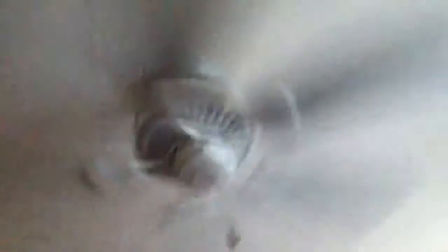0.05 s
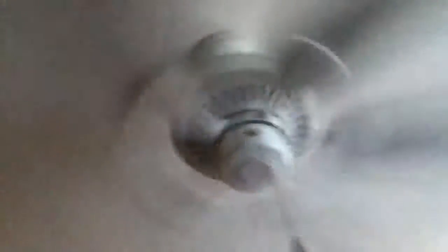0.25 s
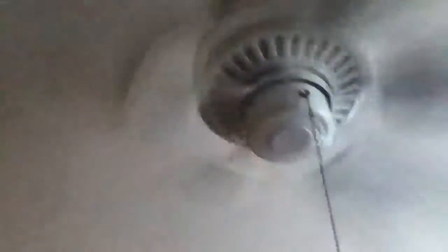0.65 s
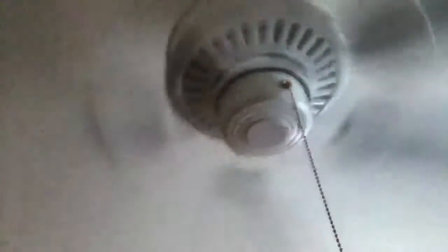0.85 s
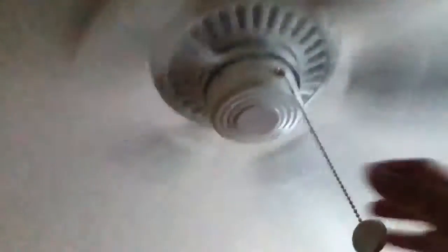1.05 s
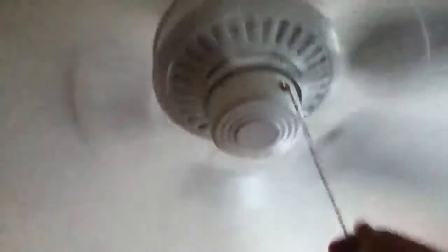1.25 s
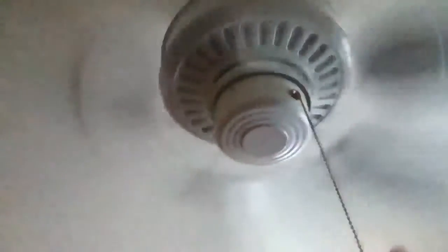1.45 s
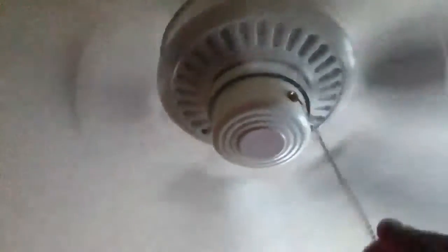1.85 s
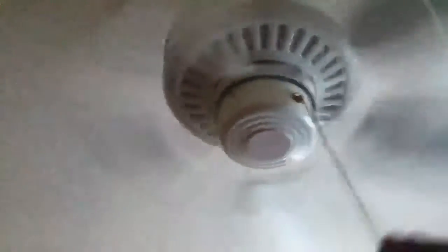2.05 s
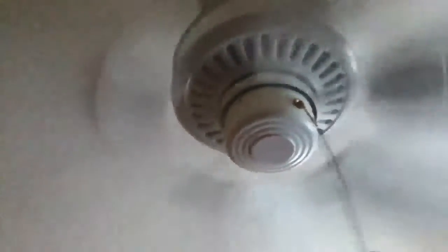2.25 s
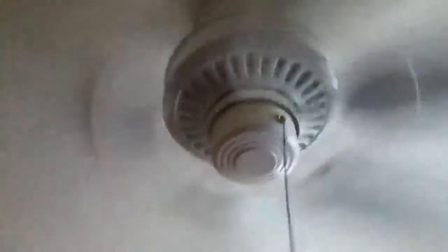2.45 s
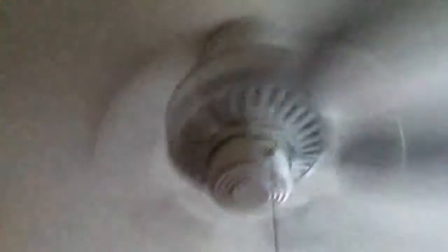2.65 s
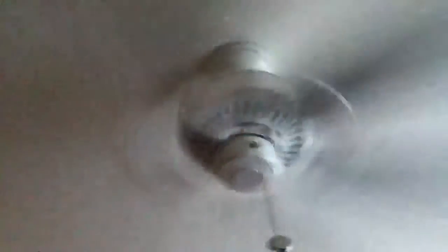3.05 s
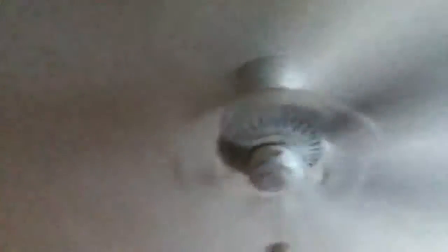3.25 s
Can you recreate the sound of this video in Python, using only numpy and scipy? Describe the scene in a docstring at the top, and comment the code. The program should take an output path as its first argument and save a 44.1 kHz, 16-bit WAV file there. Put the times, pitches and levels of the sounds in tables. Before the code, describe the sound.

A ceiling fan's pull chain switch clacks over a steady low blade rush and faint motor hum in a bedroom. The downdraft buffets the microphone in low puffs until about 3 seconds. Between 1.5 and 2.2 seconds come three quick pulls, each with ticking beads, a clack and a lightly ringing snap back. Small handling knocks follow near 2.5, 2.9 and 3.1 seconds, with one pendant tick at 2.6.

```python
"""The switch of a ceiling fan is pulled three times by its bead chain, heard from just below in a bedroom.
Each time the beads tick, the switch clacks down, and its spring snaps it back, ringing the motor housing.
All along the blades rush, the motor hums and the downward draught buffets the microphone.
Afterwards a hand makes a few small knocks on the camera, and the pendant on the chain ticks once."""
import sys
import numpy as np
from scipy import signal
from scipy.fft import rfft, irfft, next_fast_len
from scipy.io import wavfile
from scipy.ndimage import map_coordinates

SR = 44100
rng = np.random.default_rng(int(sys.argv[2]) if len(sys.argv) > 2 else 0)


def to_wav(sig):
    """Store sig (one row per channel, or 1-D mono) as 16-bit WAV at the path in sys.argv[1].

    Samples outside -1..1 are clipped; the rate is SR.
    """
    pcm = np.clip(np.atleast_2d(sig), -1, 1) * 32767
    pcm = np.round(pcm).astype(np.int16)
    wavfile.write(sys.argv[1], SR, pcm.T)  # frames by channels


N = 149940

# The tone of metal contact, shared by the beads and the pulls. Each row: frequency in Hz, level in dB.
CONTACT_TONE = [(250, -25), (560, 14.5), (750, -1), (1450, 6), (2000, 3.5), (2900, -1), (3600, 7),
                (4400, -2), (5100, -15.5), (8000, -18.5), (15000, -25)]


def amp(db):
    """Turn decibels into a number to multiply by."""
    return 10 ** (np.asarray(db) / 20)


def unit(x):
    """Scale a sound to an average power of 1."""
    return x / np.sqrt(np.mean(x ** 2) + 1e-20)


def along(points, hz):
    """Read between (Hz, value) points, with frequency on a log scale."""
    f, values = np.transpose(points)
    return np.interp(np.log(hz + 1), np.log(f + 1), values)


def filtered(x, response):
    """Multiply each frequency f in a sound by response(f)."""
    size = next_fast_len(len(x) + SR // 4)
    return irfft(rfft(x, size) * response(np.fft.rfftfreq(size, 1 / SR)), size)[:len(x)]


def coloured(x, points):
    """Give a sound the tone drawn by (Hz, dB) points, using a filter of energy 1."""
    size = 2048
    cepstrum = irfft(np.log(amp(along(points, np.fft.rfftfreq(size, 1 / SR)))))
    cepstrum[1:size // 2] *= 2  # folding makes the filter ring only after a hit, never before
    cepstrum[size // 2 + 1:] = 0
    ring = irfft(np.exp(rfft(cepstrum)))
    return signal.fftconvolve(x, ring / np.linalg.norm(ring))[:len(x)]


def fade(t, t60):
    """Die away by 60 dB in t60 seconds, the fade time."""
    return np.exp(-np.log(1000) * t / max(t60, 1 / SR))


def wobble(rate):
    """A smooth curve through `rate` random values a second."""
    return map_coordinates(rng.standard_normal(256), [np.arange(N) * rate / SR], mode="wrap")


def add(track, start_s, x):
    """Mix a sound into the track at its start time."""
    i = max(round(start_s * SR), 0)
    track[i:i + len(x)] += x[:len(track) - i]


def bedroom(x, echo_db=-11.5, fade_s=0.39):
    """A furnished room adds a short, soft tail of echoes."""
    t = np.arange(SR // 2) / SR
    tail = rng.standard_normal(len(t)) * fade(t, fade_s) * (1 - np.exp(-t / 0.0058))
    return x + amp(echo_db) * signal.fftconvolve(x, tail / np.linalg.norm(tail))[:len(x)]


def microphone_hiss(level_db=-65):
    """The microphone adds a faint, steady hiss."""
    # Its tone. Each row: frequency in Hz, level in dB.
    tone = [(300, -5.5), (4000, 0), (9000, -2), (15500, -6)]
    return amp(level_db) * unit(filtered(rng.standard_normal(N), lambda f: amp(along(tone, f))))


def blade_rush():
    """The blades stir the air into a low rush."""
    # The tone of the air. Each row: frequency in Hz, level in dB.
    tone = [(20, -26), (45, 2.5), (100, 7.5), (170, -1.5), (250, -3.5), (400, -10.5), (700, -18),
            (1300, -23), (2800, -27.5), (6000, -35.5)]
    # A slight swell as the camera comes near. Each row: time in seconds, level in dB.
    swell = [(0, -52.5), (1.05, -52.5), (2.2, -51.5), (3.4, -52.5)]
    air = unit(filtered(rng.standard_normal(N), lambda f: amp(along(tone, f))))
    return amp(np.interp(np.arange(N) / SR, *np.transpose(swell))) * air


def motor_hum():
    """The motor hums, wavering a little in level and pitch."""
    # The notes in the hum. Each row: pitch in Hz, level in dB.
    notes = [(118.5, -57.5), (240, -62.5), (360, -84)]
    t = np.arange(N) / SR
    return sum(amp(db + 0.86 * wobble(5.83)) * np.sin(2 * np.pi * hz * t + .5 * wobble(5.06))
               for hz, db in notes)


def downdraught(bass_cut_hz=61, steepness=4.5, small_swirls_db=-47.5):
    """Swirling air hits the microphone in low puffs; faster swirls reach higher frequencies."""
    # The puffs. Each row: middle in seconds, length in seconds, level in dB, upper edge in Hz.
    puffs = [(0.214, 0.019, -38.5, 167), (0.261, 0.013, -41, 186), (.303, 0.018, -32.5, 120),
             (0.348, 0.053, -44, 136), (.51, 0.017, -44, 153), (.595, 0.029, -37.5, 104),
             (0.637, 0.03, -34, 186), (.712, 0.016, -31, 148), (.742, 0.036, -36, 164),
             (0.825, 0.016, -28, 160), (0.894, 0.023, -44, 168), (0.954, 0.011, -30, 262),
             (.976, 0.014, -28.5, 173), (1.042, 0.016, -24, 129), (1.086, .02, -34, 182),
             (1.119, 0.013, -28, 185), (1.157, 0.018, -33, 194), (1.314, 0.023, -35.5, 187),
             (1.378, 0.021, -31.5, 198), (1.412, .03, -40, 178), (1.497, 0.038, -32, 192),
             (1.551, 0.027, -46, 150), (1.593, 0.058, -36.5, 165), (1.789, 0.033, -45.5, 141),
             (1.825, 0.046, -39.5, 203), (1.91, 0.024, -28, 146), (1.974, 0.058, -34, 195),
             (2.043, 0.057, -40.5, 198), (2.147, 0.11, -43.5, 152), (2.233, 0.023, -31.5, 153),
             (2.257, 0.0092, -34.5, 260), (2.32, 0.034, -35, 223), (2.378, 0.047, -53, 220),
             (2.409, .045, -32, 219), (2.5, 0.17, -43, 167), (2.588, 0.012, -31, 237),
             (2.656, 0.075, -37.5, 236), (2.717, 0.025, -28, 282), (2.741, .03, -39, 300),
             (2.805, 0.022, -31.5, 247), (3.0, 0.041, -46, 170), (3.032, 0.012, -44.5, 273)]
    out, t = np.zeros(N), np.arange(-SR // 6, SR // 6) / SR
    for middle_s, length_s, db, edge_hz in puffs:
        swell = np.exp(-2 * (t / length_s) ** 2)
        rumble = lambda f: 1 / np.hypot(1, (f / edge_hz) ** steepness)
        small_swirls = lambda f: amp(small_swirls_db) / np.hypot(1, (f / edge_hz / 2.61) ** 3)
        bass_cut = lambda f: 1 / np.hypot(1, (bass_cut_hz / (f + 1)) ** 3)
        gust = swell * rng.standard_normal(len(t))
        puff = filtered(gust, lambda f: (rumble(f) + small_swirls(f)) * bass_cut(f))
        add(out, middle_s + t[0], amp(db) * puff * np.linalg.norm(swell) / np.linalg.norm(puff))
    return out


def hand_knocks():
    """Dry knocks travel through the camera body; softer ones have less treble."""
    # The knocks. Each row: start in seconds, level in dB, thud pitch in Hz, upper edge in Hz.
    knocks = [(2.4714, -14, 405, 1440), (2.9114, -9, 423, 4220), (3.1157, -18.5, 336, 920),
              (3.118, -19.5, 305, 500)]
    # The tone of the body. Each row: multiple of the thud pitch, level in dB.
    body_tone = [(.3, -34), (.7, -3), (1, 9), (1.3, 2), (2, 0), (3, -7.5), (5, -17), (10, -23.5), (16, -28)]
    out, push = np.zeros(N), (np.arange(SR // 10) == 0) * 1.0
    hz = np.geomspace(20, SR / 2, 200)
    for start_s, db, thud_hz, edge_hz in knocks:
        body_db = along(np.array(body_tone) * [thud_hz, 1], hz)
        treble_loss_db = 10 * np.log10(1 + (hz / edge_hz) ** 6)
        tone = np.column_stack([hz, np.maximum(body_db - treble_loss_db, -70)])
        add(out, start_s, amp(db) * coloured(push, tone))
    return out


def pendant():
    """The pendant on the chain gives one small tick that dies at once."""
    # The tick. Each row: start in seconds, level before filtering in dB, pitch in Hz, fade in seconds.
    ticks = [(2.6008, -26.5, 2700, 0.0023)]
    out, t = np.zeros(N), np.arange(SR // 20) / SR
    for start_s, db, hz, fade_s in ticks:
        add(out, start_s, amp(db) * fade(t, fade_s) * np.sin(2 * np.pi * hz * t))
    return filtered(out, lambda f: f / np.hypot(f, 1500) / np.hypot(1, (f / 3900) ** 12))


def bead_chain(beads_per_s=450, bead_fade_s=.03):
    """Beads tick unevenly over the rim of their hole while the chain moves."""
    # The slides of the chain. Each row: start in seconds, end in seconds, level in dB.
    slides = [(1.495, 1.572, -58.5), (1.656, 1.684, -61.5), (1.758, 1.815, -54.5), (1.838, 1.87, -65.5),
              (1.902, 1.945, -57), (1.988, 2.037, -59), (2.106, 2.14, -64), (2.157, 2.18, -57)]
    t = np.arange(N) / SR
    ticks = (rng.random(N) < beads_per_s / SR) * 1.0
    rattle = signal.fftconvolve(ticks, fade(t[:SR // 20], bead_fade_s))[:N] * rng.standard_normal(N)
    moving = sum(amp(db) * np.clip(np.minimum(t - start, end - t) / .004, 0, 1)
                 for start, end, db in slides)
    return coloured(unit(rattle) * moving, CONTACT_TONE)


def clack(rise_ms, scrape_s, tone, notes, snap_db, snap_s=0.0079, ring_db=-4.5):
    """One hit inside the switch: a snap, a short scrape and the ring of the housing."""
    t = np.arange(SR // 2) / SR
    contact = rng.standard_normal(len(t)) * (fade(t, scrape_s) + amp(snap_db) * fade(t, snap_s))
    ring = np.zeros(len(t))
    for hz, db, fade_s in notes:
        strength = amp(db + rng.normal(0, 3.9))  # no two hits ring quite alike
        pitch_hz = hz * rng.normal(1, 0.0019)
        ring += strength * fade(t, fade_s) * np.sin(2 * np.pi * (pitch_hz * t + rng.random()))
    rise = 1 - np.exp(-t * 1000 / max(rise_ms, .1))
    return rise * (coloured(contact, tone) + amp(ring_db) * ring)


def switch():
    """The toothed wheel clacks over on each pull, and its spring snaps it back on release."""
    # The hits. Each row: start in seconds, gain in dB, rise in milliseconds, scrape fade in seconds.
    pulls = [(1.502, -55, 3.4, 0.015), (1.54, -32.5, 3.3, .04), (1.8063, -35, 1.8, 0.025),
             (2.0252, -42, 1, 0.028), (2.0385, -35, 2.4, 0.05)]
    releases = [(1.6956, -37, 1.3, 0.048), (1.9365, -33.5, 1.5, 0.047), (2.1767, -35, 0.52, 0.03)]
    # The tone of the snap back. Each row: frequency in Hz, level in dB.
    release_tone = [(300, -33), (900, -29), (1400, 5), (1950, -12), (2400, 8.5), (2950, 0), (3650, 10.5),
                    (4200, -1), (5000, -33), (8000, -14.5), (15000, -60)]
    # The ringing notes of the motor housing.
    # Each row: pitch in Hz, gain on a pull in dB, gain on a release in dB, fade in seconds.
    housing = [(546, -5, -21, 0.074), (599, -7.5, -16, 0.089), (929, -21, -20, 0.24),
               (1328, -20, -17.5, 0.19), (1490, -25, -30, 0.33), (1870, -18.5, -10.5, 0.083),
               (2345, -10.5, -14, 0.11), (2660, -31, -26, .25), (2835, -28, -23, 0.35),
               (3390, -22, -38, 0.21), (3600, -16, -28, 0.064), (4160, -30, -25, 0.097),
               (4045, -11.5, -6, 0.084), (4250, -15, -14, 0.091)]
    pull_notes = [(hz, db, fade_s) for hz, db, _, fade_s in housing]
    release_notes = [(hz, db, fade_s) for hz, _, db, fade_s in housing]
    out = np.zeros(N)
    for start_s, db, rise_ms, scrape_s in pulls:
        hit = clack(rise_ms, scrape_s, CONTACT_TONE, pull_notes, snap_db=1)
        add(out, start_s, bedroom(amp(db) * hit))
    for start_s, db, rise_ms, scrape_s in releases:
        hit = clack(rise_ms, scrape_s, release_tone, release_notes, snap_db=0.5)
        add(out, start_s, bedroom(amp(db) * hit))
    return out


def scene():
    """Mix everything into one channel; only the switch and chain echo in the room."""
    background = blade_rush() + microphone_hiss() + motor_hum()
    return (background + switch() + bedroom(bead_chain()) + pendant() + downdraught() + hand_knocks())[None]


def record(dry, top_hz=15800):
    """The camera cuts off the very highest treble."""
    return np.array([filtered(channel, lambda f: f < top_hz) for channel in dry])


dry = scene()
out = record(dry)
to_wav(out)
```